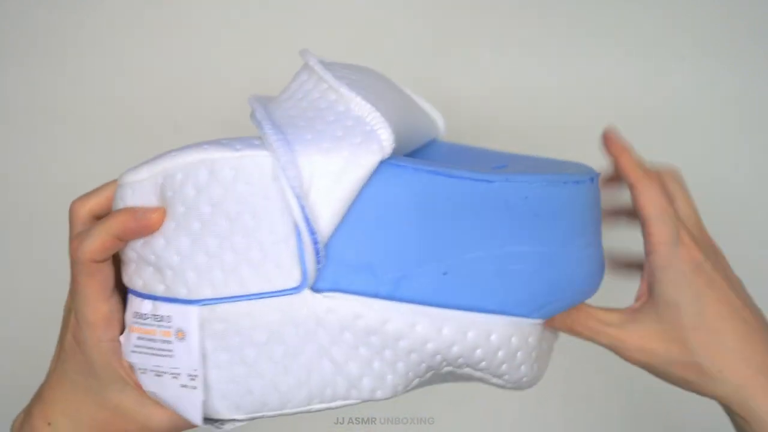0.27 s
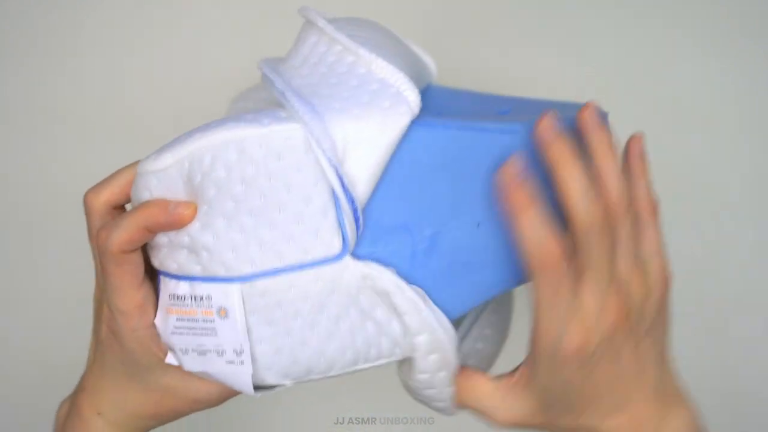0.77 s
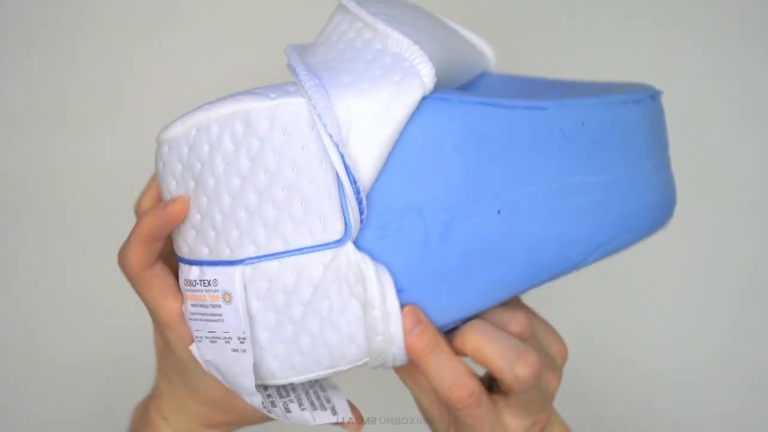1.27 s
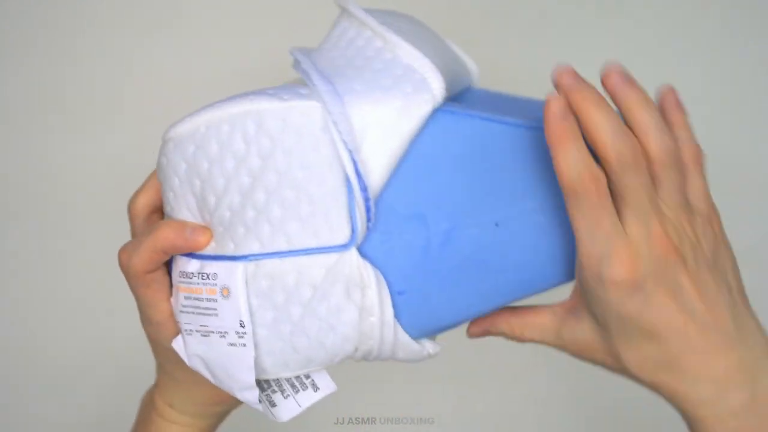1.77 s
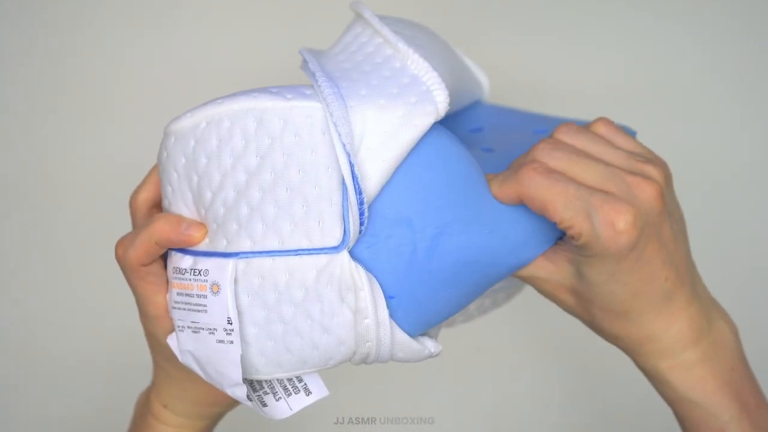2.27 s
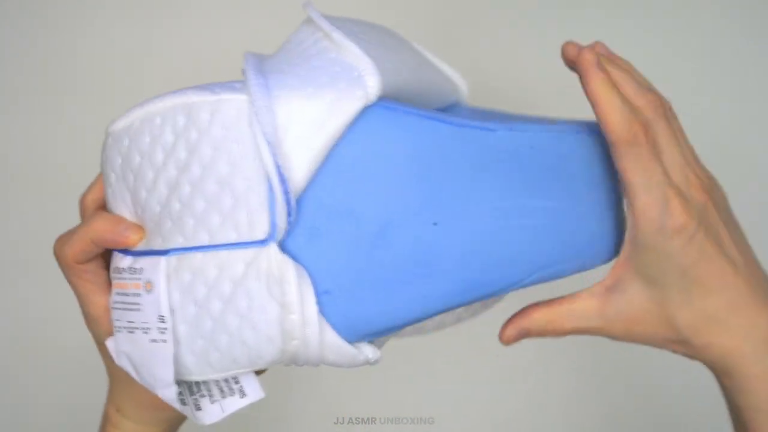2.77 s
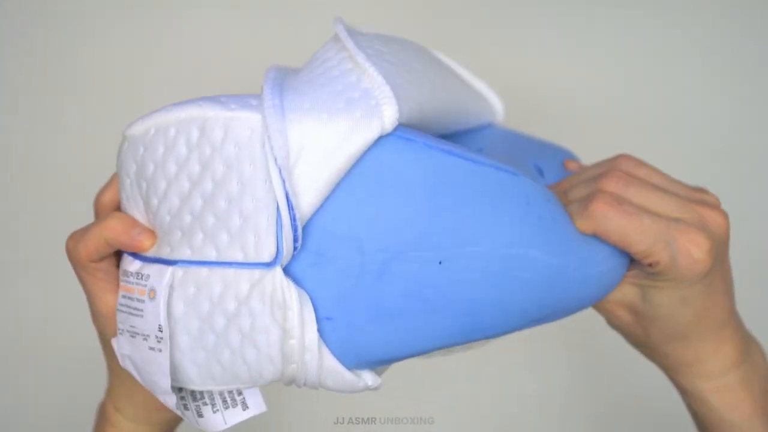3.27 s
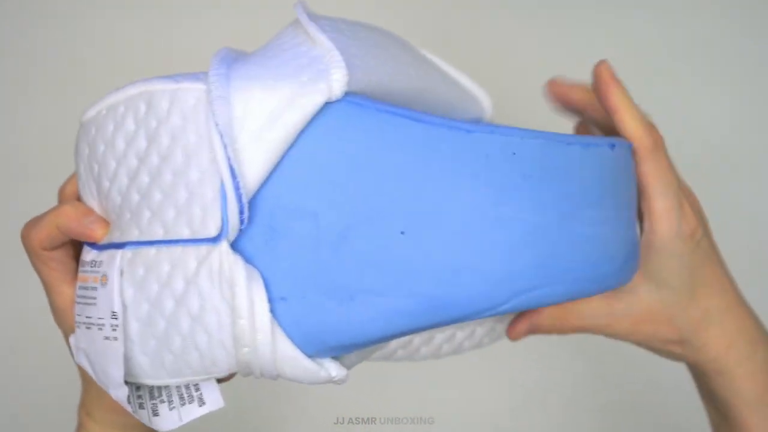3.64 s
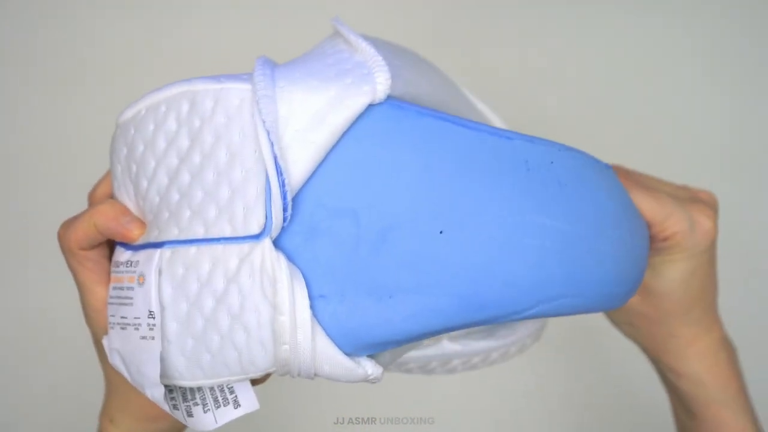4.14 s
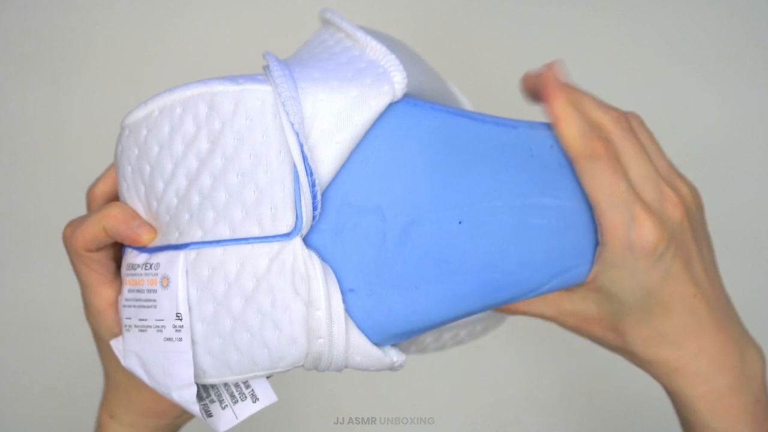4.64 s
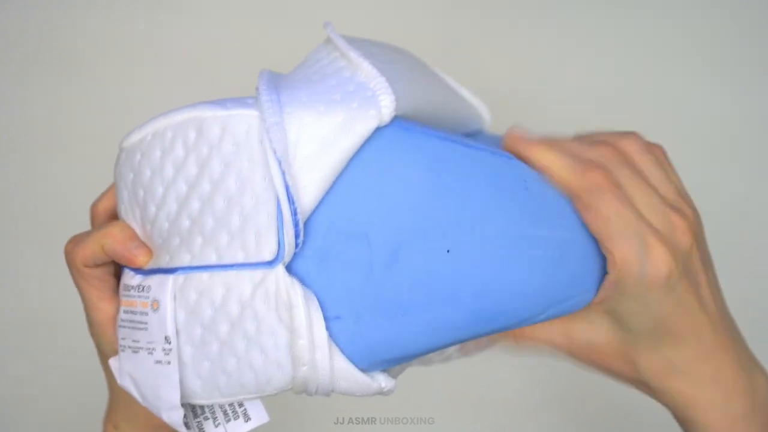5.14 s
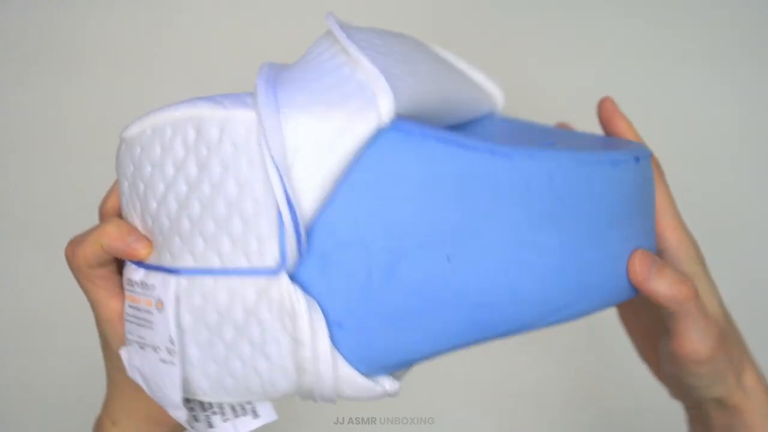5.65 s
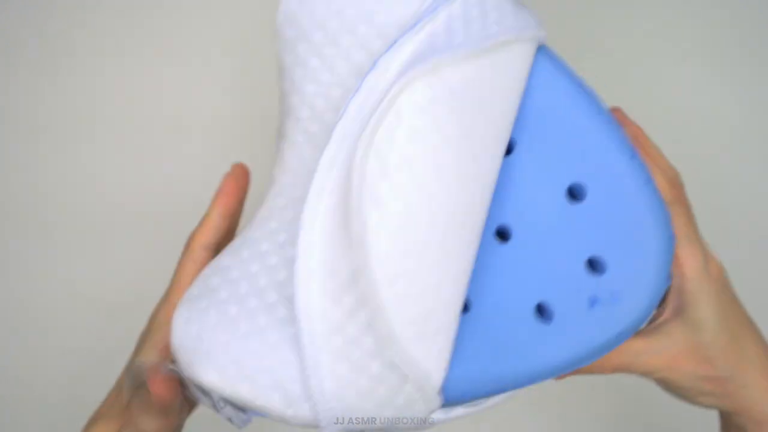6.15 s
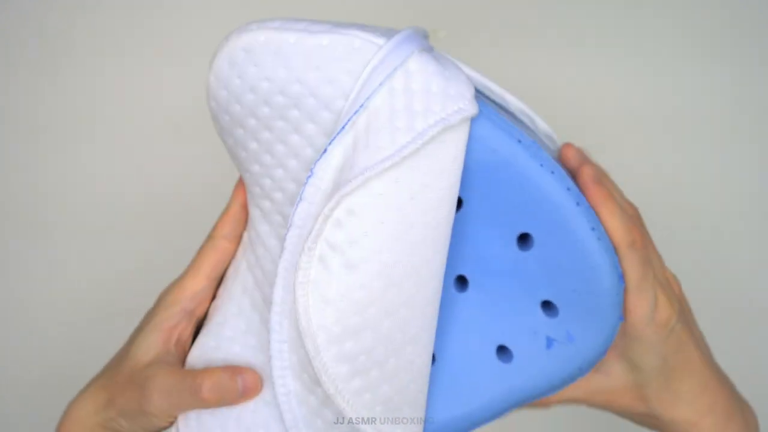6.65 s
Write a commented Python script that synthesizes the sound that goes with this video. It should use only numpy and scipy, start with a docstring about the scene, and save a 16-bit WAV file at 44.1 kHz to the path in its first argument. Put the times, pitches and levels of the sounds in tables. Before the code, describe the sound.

Close, quiet fabric rubbing with faint metallic tinkles and sticky foam pops, ending in a loud double snap, a quick cloth rasp and brisk rustling.

```python
"""A cloth cover rustles under two hands in a quiet room, with a faint tinkle of its loose zipper pull.
The hands work a foam pillow out of the cover: folds snap, and a palm peels off the foam four times.
Near the end the pillow is turned over with a sharp double snap and a short, bright zip of cloth.
Rubbing is made of countless tiny random slips, snaps of short filtered pushes, and the tinkle of
fading sine waves. A short room echo and a steady, faint floor lie around it all."""
import sys
import numpy as np
from scipy import signal
from scipy.fft import rfft, irfft
from scipy.io import wavfile

SR = 44100
rng = np.random.default_rng(int(sys.argv[2]) if len(sys.argv) > 2 else 0)


def to_wav(sig):
    """Store sig (one row per channel, or 1-D mono) as 16-bit WAV at the path in sys.argv[1].

    Samples outside -1..1 are clipped; the rate is SR.
    """
    pcm = np.clip(np.atleast_2d(sig), -1, 1) * 32767
    pcm = np.round(pcm).astype(np.int16)
    wavfile.write(sys.argv[1], SR, pcm.T)  # frames by channels


N = 304731
TIME = np.arange(N) / SR  # seconds


def from_db(db):
    """Turn decibels into a gain."""
    return 10 ** (np.asarray(db) / 20)


def rms_one(x):
    """Scale a sound to unit power."""
    return x / np.sqrt(np.mean(x ** 2) + 1e-20)


def drift(rate_hz):
    """Slow random wandering with unit spread: noise smoothed by two equal one-pole filters."""
    r = np.exp(-2 * np.pi * rate_hz / SR)
    noise = rng.standard_normal(N + SR)
    # the first second lets the filter settle
    return rms_one(signal.lfilter([1], [1, -2 * r, r * r], noise)[SR:])


def colour(x, spectrum, size=4096):
    """Filter a sound to a given spectrum, with the response as early as possible (minimum phase)."""
    hz, db = np.transpose(spectrum)
    grid_hz = np.maximum(np.arange(size // 2 + 1) * SR / size, 1)
    gain = from_db(np.interp(np.log(grid_hz), np.log(hz), db))
    # folding the cepstrum onto positive times makes the filter causal
    cepstrum = irfft(np.log(gain))
    cepstrum[1:size // 2] *= 2
    response = irfft(np.exp(rfft(cepstrum[:size // 2], size)))
    return signal.oaconvolve(x, response)[:len(x)]


def band(x, hz, kind):
    """Second-order low-pass or high-pass."""
    return signal.sosfilt(signal.butter(2, min(hz, SR / 2 - 1), kind, fs=SR, output="sos"), x)


def resonate(x, hz, width_hz):
    """One resonance with gain 1 at its peak."""
    r = np.exp(-np.pi * width_hz / SR)
    top = np.array([1, 0, -1]) * (1 - r * r) / 2
    bottom = [1, -2 * r * np.cos(2 * np.pi * hz / SR), r * r]
    return signal.lfilter(top, bottom, x + 1e-18)


def friction(spectrum, per_s, spread_db, clump_db, clump_hz):
    """Countless tiny slips of uneven size, bunched by stick and slip; unit power."""
    signs = rng.choice([-1, 1], N)
    sizes = signs * from_db(spread_db * np.minimum(rng.exponential(1, N), 4))
    happens = rng.random(N) < per_s / SR
    bunching = from_db(clump_db * np.tanh(drift(clump_hz) / 2) * 2)
    return rms_one(colour(sizes * happens * bunching, spectrum))


def hand_echo(x, delay_s, strength, soft_hz=6000):
    """Sound bounced off the soft palm adds a comb of peaks and notches that fades in the treble."""
    echo = np.interp(TIME - delay_s, TIME, band(x, soft_hz, "low"))
    return (x + strength * echo) / np.sqrt(1 + strength ** 2)


def wander(x, gap_s=0.000612, sway=0.27, rate_hz=2.58, strength=0.46):
    """The gap under the hand keeps changing, so the echo delay and the colour of the rub shift."""
    return hand_echo(x, gap_s * np.exp(sway * drift(rate_hz)), strength)


def moves(rows, rise_db_per_s, fall_db_per_s, silent_db=-120):
    """Levels in dB of hand movements: each sets in, swells or fades evenly while it lasts, and dies away."""
    out = silent_db
    for s, length_s, db, swell_db, *layers_db in rows:
        t = TIME - s
        # the row's level is reached halfway through the movement
        held = swell_db * (np.clip(t / length_s, 0, 1) - .5)
        before = rise_db_per_s * np.minimum(t, 0)
        after = fall_db_per_s * np.maximum(t - length_s, 0)
        layers = np.array([0, *layers_db])[:, None]
        out = np.maximum(out, db + held + before - after + layers)
    return out


# The quiet floor of the room. Each row: frequency in Hz, relative level in dB.
ROOM_COLOUR = [(20, 0), (50, -6.5), (100, -7.5), (200, -11.5), (400, -15), (880, -23.5), (1300, -17.5),
               (3000, -20.5), (5500, -27), (16000, -28.5)]


def room_floor(level_db=-56.5):
    """Steady noise with the colour of the quiet room."""
    noise = rng.standard_normal(N + SR)
    return from_db(level_db) * rms_one(colour(noise, ROOM_COLOUR)[SR:])


# The faint hiss in which the channels differ. Each row: frequency in Hz, relative level in dB.
HISS_COLOUR = [(25, 13), (70, 12), (170, -19), (1000, -12), (2000, -11), (5000, -8.5), (15000, 4.5)]


def channel_hiss(level_db=-78):
    """One very faint noise, upside down in the second channel."""
    hiss = rms_one(colour(rng.standard_normal(N), HISS_COLOUR))
    return from_db(level_db) * hiss * np.array([[1], [-1]])


# Cloth sliding under the hands. Each row: start in seconds, length in seconds, rub level in dB halfway
# through, swell over the stroke in dB, fibre fizz in dB against the rub, flapping folds in dB against the rub.
CLOTH_STROKES = [(0.0, .27, -51.5, 1, -8, -4), (0.305, 0.16, -52.5, -1.5, -7.5, -4),
                 (0.54, 0.075, -55, 2, -6, -26), (0.67, 0.2, -56, -10.5, -7.5, -14),
                 (0.868, .14, -46.5, -4.5, -3.5, -13), (1.025, 0.062, -52.5, -5, -7, -4),
                 (1.158, 0.038, -46, 3, -13, -6), (1.252, 0.031, -41.5, 4, -4.5, -13.5),
                 (1.31, 0.14, -50, -3.5, -7.5, -6.5), (1.51, 0.036, -50.5, 1, -11, -5.5),
                 (1.597, 0.073, -49, -8, -9.5, -3), (1.67, 0.094, -57, 3.5, -19, -1),
                 (1.885, .14, -55, -6, -9, -3), (2.945, 0.28, -59.5, -4.5, -8, -4.5),
                 (3.6, .1, -60.5, 1, -7, -6), (4.535, 0.042, -52, 9, -7.5, -9),
                 (4.757, 0.052, -58, 0, -14, 0.5), (4.835, 0.039, -55, 1, -12, -12),
                 (4.965, 0.042, -62.5, 7, -14, -0.5), (5.71, 0.35, -50.5, 1.5, -7.5, -8),
                 (6.028, 0.085, -39, 4, -6.5, -8), (6.21, 0.045, -38.5, 0, -6, -6.5),
                 (6.265, 0.082, -40, -10, -4.5, -13), (6.36, 0.11, -47, -2, -11, -8.5),
                 (6.46, .05, -41.5, 6.5, -5, -20), (6.526, 0.0041, -30.5, 1.5, -1.5, -13),
                 (6.55, 0.14, -39.5, -10, -5.5, -12.5), (6.72, .16, -58, -17, -11, -12.5)]
# The hands never lie quite still. The three values: lowest level of rub, fizz and folds, each in dB.
RESTING_GRIP = (-65, -69.5, -75.5)


def cloth_levels(rise_db_per_s=410, fall_db_per_s=301, waver_db=0.95, waver_hz=48):
    """Strokes stand out of the resting grip, and rub, fizz and folds waver together with hand pressure."""
    strokes_db = moves(CLOTH_STROKES, rise_db_per_s, fall_db_per_s)
    grip_db = np.array(RESTING_GRIP)[:, None]
    return np.maximum(strokes_db, grip_db) + waver_db * drift(waver_hz)


# The weave rubbing. Each row: frequency in Hz, relative level in dB.
RUB_COLOUR = [(150, -25), (550, -9.5), (800, -3), (1500, -1.5), (2700, 0.5), (4000, 1.5), (6200, 3.5),
              (7300, -8.5), (9000, -10.5), (15000, -28)]
# The fibres fizzing. Each row: frequency in Hz, relative level in dB.
FIZZ_COLOUR = [(4500, -32), (7000, 7), (8300, 2), (11000, 4), (13500, -2), (16000, -17)]
# The slack folds flapping. Each row: frequency in Hz, relative level in dB.
FOLD_COLOUR = [(200, -21.5), (520, -13.5), (670, -3.5), (790, 4.5), (930, -4), (1130, -6), (1450, -8),
               (2500, -13.5), (6000, -21), (15000, -44)]
# Folds ring higher while the hands hold the cover taut. Each row: time in seconds, pitch in Hz before sway.
FOLD_TENSION = [(0, 795), (.7, 830), (1.0, 1057), (5.0, 1022), (5.7, 847.3), (6.9, 852)]


def cloth(rub_db, fizz_db, fold_db, slack_hz=800, sway=.1, sway_hz=12):
    """The weave rubs, its fibres fizz, and slack folds flap in coarser grains that rise with tension."""
    rub = wander(friction(RUB_COLOUR, per_s=5000, spread_db=1.5, clump_db=2.5, clump_hz=106))
    fizz = friction(FIZZ_COLOUR, per_s=12000, spread_db=2.2, clump_db=1.4, clump_hz=110)
    folds = friction(FOLD_COLOUR, per_s=260, spread_db=1.5, clump_db=4.0, clump_hz=34.5)
    # playing the flaps faster raises their pitch; each fold's own size makes it sway
    tension = np.interp(TIME, *np.transpose(FOLD_TENSION)) / slack_hz
    speed = tension * np.exp(sway * drift(sway_hz))
    folds = np.interp(np.cumsum(speed) % N, np.arange(N), folds)
    return from_db(rub_db) * rub + from_db(fizz_db) * fizz + from_db(fold_db) * folds


# The zipper pull is shaken. Each row: time in seconds, level in dB before a fixed 6.5 dB boost.
PULL_TINKLES = [(0.013, -58), (1.042, -48), (1.533, -54), (1.72, -59), (1.935, -52), (2.007, -51.5),
                (2.813, -61), (2.953, -59), (3.006, -53), (3.124, -46), (3.832, -53), (4.547, -47.5),
                (4.586, -56), (4.757, -54), (4.985, -59.5), (6.636, -43), (6.728, -56), (6.832, -54)]


def zipper_pull(pull_hz=7510, scatter_hz=45, t60_s=0.065, pair_hz=70, pair_db=-9,
                rattle=0.027, rattle_s=0.034, size=11025):
    """The small metal tab rings in two close tones and chatters against its slider."""
    out, t = np.zeros(N + size), np.arange(size) / SR
    chances = rng.standard_normal((len(PULL_TINKLES), size))
    for (s, db), chance in zip(PULL_TINKLES, chances):
        hz = pull_hz + scatter_hz * chance[0]
        touches = rattle * chance * np.exp(-t / rattle_s)
        touches[0] = 1
        main = np.sin(2 * np.pi * hz * t)
        partner = np.sin(2 * np.pi * (hz + pair_hz) * t + np.pi * chance[-1])
        ring = (main + from_db(pair_db) * partner) * from_db(-60 * t / t60_s)
        at = round(s * SR)
        out[at:at + size] += from_db(db + 6.5) * signal.fftconvolve(touches, ring)[:size]
    return out[:N]


def creases(rub_db, per_s=5, mean_db=-49.5, thump_db=-22, bright_db=-8, count=120):
    """Small creases give way at random, stronger while the cloth is rubbed harder; rows as in FOLD_SNAPS."""
    times = np.cumsum(rng.exponential(1, count)) / per_s
    level_db = mean_db + rub_db - rub_db.mean()
    return [(s, level_db[int(s * SR)], thump_db, bright_db) for s in times if s < TIME[-1]]


# Snaps of folds and of skin leaving the foam. Each row: time in seconds, level in dB,
# foam thump in dB against the crack before a 3 dB boost, brightness in dB before a 0.5 dB cut.
FOLD_SNAPS = [(0.3417, -55, -11, 8), (0.3626, -38.5, -21, -34), (0.3775, -40, -28, 21),
              (0.4273, -37, -17, -24), (0.7304, -47.5, -10, -28), (1.4633, -39, -14, -4),
              (1.6085, -34.5, -8, -36), (1.6148, -37.5, -12, 19), (1.6266, -35, -19, 14),
              (1.8856, -43.5, -6, -13), (1.9134, -45, -29, -1), (2.0274, -45, -14, 17),
              (2.693, -45.5, -8, 9), (2.8139, -48, -24, -2), (3.0056, -45.5, -21, 9), (3.1435, -48, -20, 5),
              (3.2332, -51, -17, 17), (3.476, -39.5, -15, 8), (3.542, -30.5, -6.5, 12),
              (3.5569, -33, -25, 2), (3.6172, -45, -13, 1), (3.9019, -47, -16, -5), (4.3567, -38.5, -5, 3),
              (4.3805, -29, -11, 15), (4.531, -45, -23, 14), (4.614, -42.5, -10, -15),
              (4.6794, -41, -18, -1), (4.806, -55, -11, -17), (5.7716, -46, -4, -7),
              (5.8568, -37, -18, -35), (5.935, -41.5, -19, -32), (5.9985, -28, -18.5, 5),
              (6.0893, -13, -18.5, 8), (6.0984, -16.5, -17, 9), (6.1955, -19, -27, 19),
              (6.252, -27, -35, -5), (6.324, -27, -39, 1), (6.3324, -26, -38, 24), (6.5172, -23.5, -47, 34),
              (6.573, -30, -46, 23), (6.6016, -31, -30, 1.5), (6.8337, -46, -24, 13),
              (6.868, -47.5, -29, 9)]
# The crack of a fold. Each row: frequency in Hz, relative level in dB.
CRACK_COLOUR = [(150, -17.5), (550, -21), (720, 0.5), (860, 0.5), (1050, 1.5), (1600, 0), (2050, 5),
                (2430, 0), (3030, 1), (3800, -2), (6200, -5), (7000, -11.5), (10500, -16), (15500, -36)]
# The dull thump of struck foam. Each row: frequency in Hz, relative level in dB.
THUMP_COLOUR = [(90, -9), (150, -5), (240, -9.5), (330, 5.5), (540, 8.5), (700, 5), (1200, -41)]


def snaps(rows, scatter_s=0.0038, scatter=0.13, rebound_s=0.000966, rebound=0.74, dull_hz=1000,
          bright_hz=5000, panel_hz=790, panel_width_hz=90, panel_db=-1, thump_s=0.0076,
          level_s=0.0028, size=2048):
    """A fold cracks, rebounds about a millisecond later and sheds smaller slips; the foam under it thumps."""
    out, t = np.zeros(N + size), np.arange(size) / SR
    chances = rng.standard_normal((len(rows), 2, size))
    # the level is the crack's energy seen as power over the first few milliseconds
    level_scale = np.sqrt(level_s * SR / size)
    for (s, db, thump_db, bright_db), (slips, wobble) in zip(rows, chances):
        push = scatter * slips * np.exp(-t / scatter_s)
        push[0] += 1
        rebound_at = int(rebound_s * SR * (1 + np.tanh(slips[-1]) / 4))
        push[rebound_at] += rebound
        tilt = [(dull_hz, 0), (bright_hz, bright_db - .5)]
        crack = colour(colour(push, CRACK_COLOUR), tilt)
        # a soft, dull flick moves a whole panel of the cover, which rings for a moment
        ring_db = panel_db - max(bright_db, -8) * 0.14
        crack = crack + from_db(ring_db) * resonate(crack, panel_hz, panel_width_hz)
        thump = colour(wobble * np.exp(-t / thump_s), THUMP_COLOUR)
        snap = rms_one(crack) + from_db(thump_db + 3.0) * rms_one(thump)
        at = round(s * SR)
        out[at:at + size] += from_db(db) * level_scale * snap
    return out[:N]


# The palm peels off the foam. Each row: start in seconds, length in seconds, crackle level in dB halfway
# through, swell over the peel in dB, hollow foam puff in dB against the crackle.
PALM_PEELS = [(2.637, 0.028, -40, 0, -7), (3.503, 0.043, -42, 3, -9.5), (4.36, 0.025, -38.5, 6.5, -6.5),
              (5.21, 0.04, -39, -3, -9.5)]
# Skin tearing loose. Each row: frequency in Hz, relative level in dB.
SKIN_COLOUR = [(120, -13), (500, -10), (900, -8), (1300, 1.5), (1700, -5), (3000, -2.5), (4000, -3.5),
               (5500, 1), (7000, -6), (8500, -9.5), (12000, -11.5), (16000, -42)]
# The hollow body of the foam. Each row: frequency in Hz, relative level in dB.
FOAM_COLOUR = [(80, -4), (200, -13), (320, -3), (450, 5.5), (570, 9), (720, 3.5), (950, -8), (2000, -13),
               (12000, -45)]


def peel(brush_db=-17.5, brush_fade_db_per_s=121):
    """Skin tears loose in a dense crackle while the foam springs back with a hollow puff."""
    level_db, _ = moves(PALM_PEELS, rise_db_per_s=323, fall_db_per_s=638)
    # the fingers brush the foam lightly before and after each peel
    brushing_db, _ = moves(PALM_PEELS, brush_fade_db_per_s, brush_fade_db_per_s)
    level_db = np.maximum(level_db, brushing_db + brush_db)
    # the puff sets in more steeply than the crackle
    _, puff_db = moves(PALM_PEELS, rise_db_per_s=600, fall_db_per_s=522)
    slips = friction(SKIN_COLOUR, per_s=3500, spread_db=4.5, clump_db=1.5, clump_hz=170)
    crackle = wander(slips, gap_s=0.00099)
    puff = friction(FOAM_COLOUR, per_s=1700, spread_db=-1.7, clump_db=5.5, clump_hz=80)
    return from_db(level_db) * crackle + from_db(puff_db) * puff


# A finger glides over the foam. Each row: start in seconds, length in seconds, level in dB halfway
# through, swell over the glide in dB.
FINGER_GLIDE = [(5.098, 0.07, -48.5, 5)]
# The gliding finger. Each row: frequency in Hz, relative level in dB.
FINGER_COLOUR = [(600, -12), (1300, -11), (2000, -5), (2800, -1.5), (4000, -4), (5300, 0), (6500, -6),
                 (8000, -8), (15000, -16)]


def finger_glide():
    """Very dense slips make a smooth glide, coloured by an echo off the hand."""
    glide = friction(FINGER_COLOUR, per_s=16000, spread_db=-2.0, clump_db=1.8, clump_hz=120)
    level_db, = moves(FINGER_GLIDE, rise_db_per_s=1700, fall_db_per_s=290)
    return from_db(level_db) * hand_echo(glide, delay_s=0.00071, strength=0.67)


# Cloth drawn fast across its ribs. Each row: time in seconds, level in dB.
ZIP_LEVEL = [(6.147, -70), (6.1478, -31), (6.158, -23.5), (6.166, -20.5), (6.171, -30), (6.184, -23.5),
             (6.193, -30), (6.198, -35), (6.207, -36), (6.225, -70)]
# The ribs of the cloth. Each row: frequency in Hz, relative level in dB.
RIB_COLOUR = [(88, -45), (150, -27), (286, -27.5), (923, -16.5), (1260, -17.5), (1870, -15), (2310, -18),
              (2810, -6.5), (4240, -8), (4670, -5), (5050, -8.5), (8230, -22.5), (10000, -15), (14000, -27),
              (16000, -41)]


def cloth_zip(silent_db=-120):
    """Dense slips over the ribs of the cloth make a short, rasping zip."""
    rasp = friction(RIB_COLOUR, per_s=12000, spread_db=1.5, clump_db=1.5, clump_hz=350)
    level_db = np.interp(TIME, *np.transpose(ZIP_LEVEL), silent_db, silent_db)
    return from_db(level_db) * rasp


def reflections(x, t60_s=0.16, wet_db=-13, first_s=0.0033, dull_hz=6500, low_hz=250):
    """A small furnished room answers with a short, dull tail of fading noise."""
    t = np.arange(SR // 2) / SR
    noise = band(band(rng.standard_normal(len(t)), dull_hz, "low"), low_hz, "high")
    tail = noise * from_db(-60 * t / t60_s) * (t > first_s)
    return from_db(wet_db) * signal.oaconvolve(x, tail / np.sqrt(np.sum(tail ** 2)))[:N]


def scene():
    """Handling, room echo and floor are alike in both channels; only the faint hiss differs."""
    rub_db, fizz_db, fold_db = cloth_levels()
    handling = cloth(rub_db, fizz_db, fold_db) + zipper_pull()
    handling = handling + snaps(FOLD_SNAPS) + snaps(creases(rub_db))
    handling = handling + peel() + finger_glide() + cloth_zip()
    return handling + reflections(handling) + room_floor() + channel_hiss()


def record(dry, cutoff_hz=15900):
    """A steep low-pass cuts off the very top of the treble."""
    return signal.sosfilt(signal.ellip(10, .1, 70, cutoff_hz, fs=SR, output="sos"), dry)


dry = scene()
out = record(dry)
to_wav(out)
```